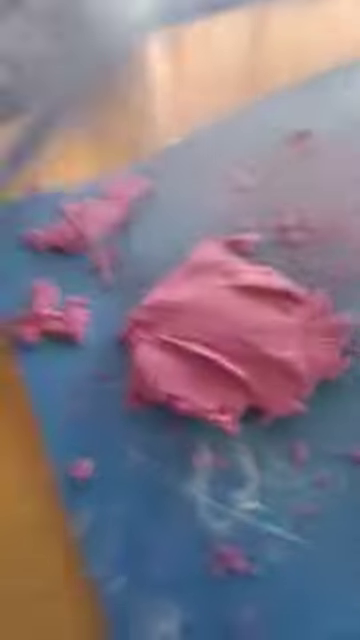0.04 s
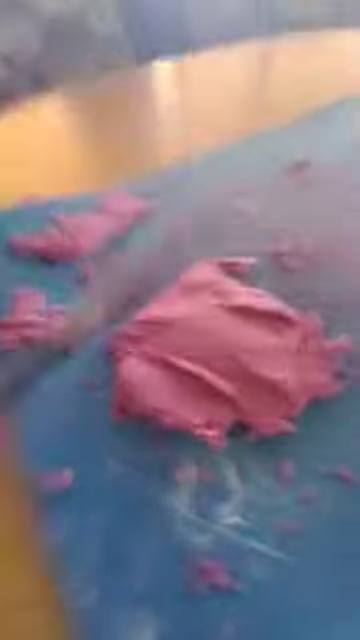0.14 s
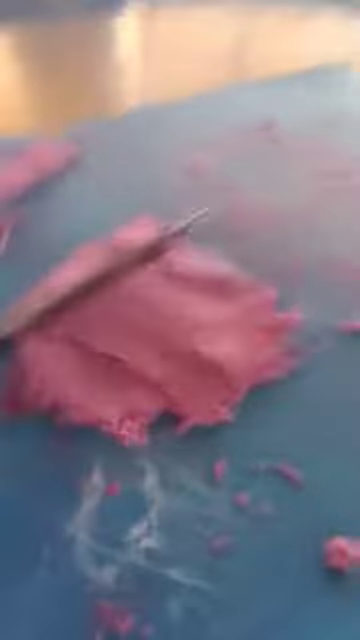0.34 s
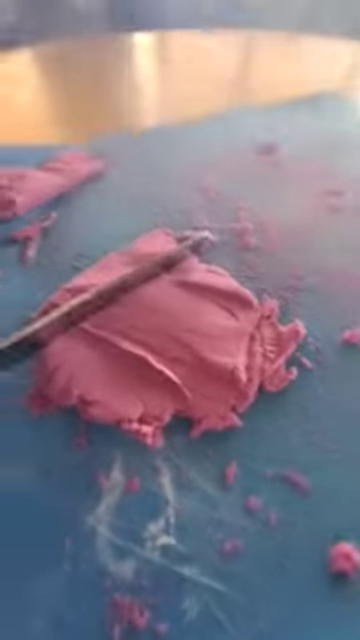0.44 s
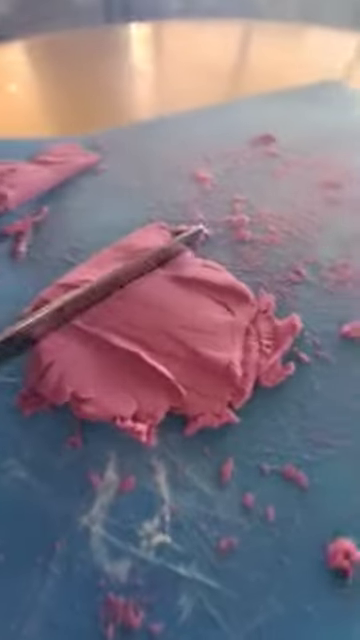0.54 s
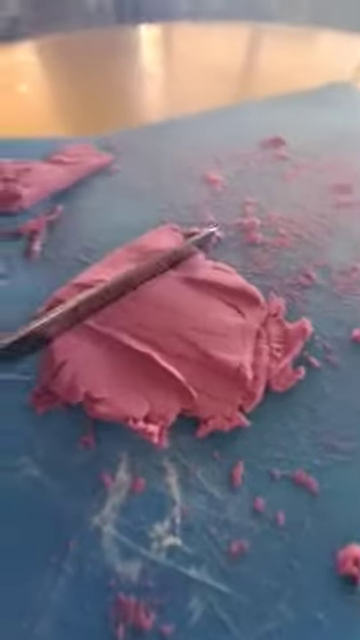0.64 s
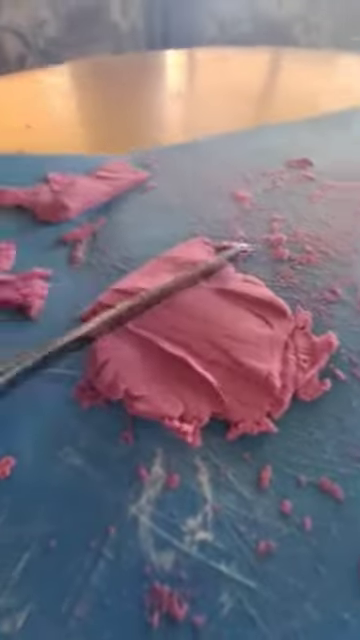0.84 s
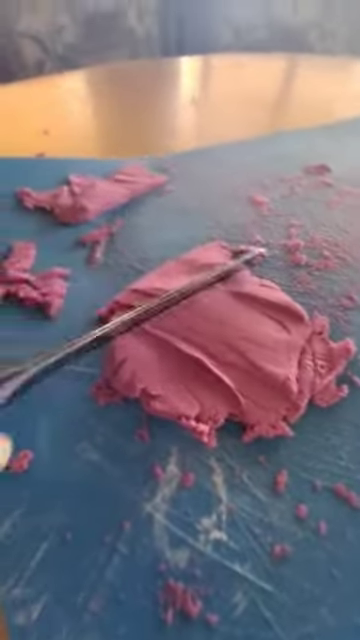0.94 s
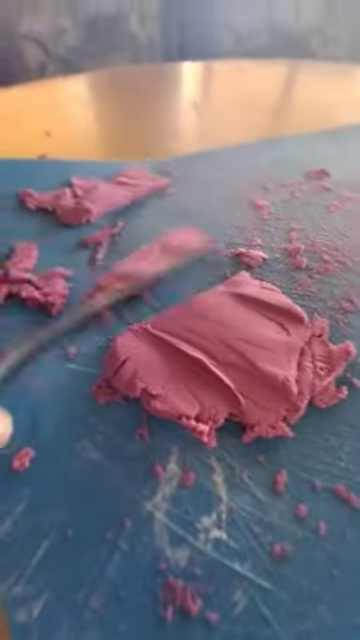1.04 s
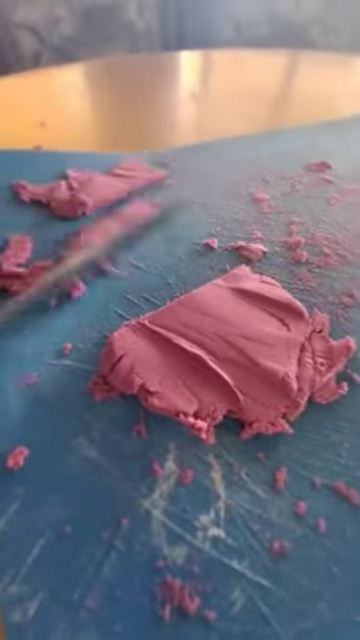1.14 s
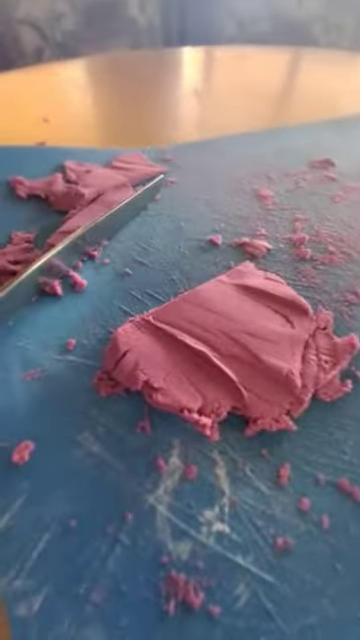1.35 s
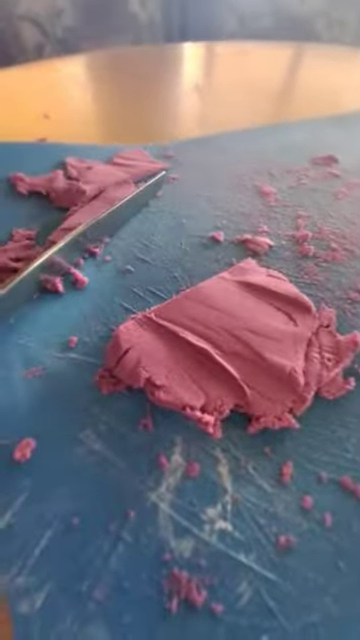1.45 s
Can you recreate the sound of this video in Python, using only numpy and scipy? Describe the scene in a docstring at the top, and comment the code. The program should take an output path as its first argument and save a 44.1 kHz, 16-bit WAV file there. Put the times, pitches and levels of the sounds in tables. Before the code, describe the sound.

Close microphone, small quiet room with faint hiss: a knife thumps the table twice, rings and rattles briefly, ticks and slips over plastic, then drags through soft sand with a grainy crunch and final light taps.

```python
"""A steel knife works through a lump of soft modelling sand on a plastic cutting board, close to the microphone.
Over hiss, faint bumps and a slip of the blade open the scene; then two loud bumps ring the table's modes.
The second sets metal modes ringing and ends in a short rattle of dense random clicks.
The blade taps and scrapes over the board in little slips, made of grit noise coloured by the board.
Then it drags a slice of sand aside in a soft crunch of grains over low rubbing; a tap and a few short slips follow."""
import sys
import numpy as np
from scipy import signal
from scipy.io import wavfile
from scipy.ndimage import uniform_filter1d

SR = 44100
rng = np.random.default_rng(int(sys.argv[2]) if len(sys.argv) > 2 else 0)


def persist_wave(psi):
    """Save psi, clipped to +-1, as 16-bit WAV."""
    counts = np.round(np.clip(psi, -1, 1) * 32767).astype(np.int16)
    wavfile.write(sys.argv[1], SR, np.atleast_2d(counts).T)


N = 66150
T = np.arange(N) / SR  # [s]

# Room and microphone noise: spectrum (frequency [Hz], relative level [dB])
HISS_COLOUR = [(60, 1.5), (160, -5), (400, -8), (700, -17), (1100, -18), (1800, -9), (3700, -13),
               (5900, -15), (7700, -11), (9300, -19.5), (16000, -21)]
# Course of the noise: (time [s], level [dB])
HISS_LEVEL = [(0, -42.5), (0.1, -48), (0.19, -45.5), (0.45, -44), (0.52, -55.5), (0.615, -61),
              (0.66, -45.5), (0.9, -50), (1.35, -47), (1.5, -49.5)]
HISS_PAN_DB = -3.5  # all pans: left over right
ROOM_T60_S, ROOM_DB = 0.34, -11

# Bumps on the table: (time [s], level [dB], tilt towards the upper modes [dB per octave])
BUMPS = [(0.002, -29, 1), (0.036, -30, -6.5), (0.2045, -14, 1), (0.236, -24.5, 3), (0.3018, -12, 2.5),
         (0.317, -17, 6.5), (0.338, -22.5, 8), (0.348, -37.5, 12.5), (0.427, -40, 1), (0.541, -38, 0.5),
         (0.581, -37, 2.5), (0.665, -34, -4)]
# Modes of table and board: (frequency [Hz], level before tilt [dB], t60 [s])
TABLE_MODES = [(64, -30, 0.077), (92.3, -8, 0.23), (102.3, -4, 0.096), (132.1, -5.5, 0.17),
               (154.2, -4, 0.22), (226.4, -9.5, 0.064), (289, -9, 0.053), (381, -10.5, 0.032),
               (586, -13, 0.042)]
# Hollow knocks of the board: (time [s], level [dB], pitch [Hz])
KNOCKS = [(0.2064, -19.5, 860), (0.3017, -6, 322), (0.3418, -16.5, 266)]

# Blows that set the metal ringing: (time [s])
CLINK_TIMES = [0.3105, 0.3485, 0.379]
# Modes of the metal: (frequency [Hz], level at first, second, third blow [dB], t60 [s])
METAL_MODES = [(1240, -40, -25, -31, .13), (1938, -46, -23, -31, .17), (3375, -52, -35, -37, .26),
               (3930, -50, -30, -35.5, .28), (5922, -34, -37, -35.5, .38), (7391, -19, -36, -38, .19),
               (8188, -40, -33, -34.5, .38), (9645, -46, -23, -42, .13), (11445, -25, -28, -52, .18),
               (13935, -31, -42, -33, .12), (14550, -39, -42, -44, .2)]
METAL_PAN_DB, METAL_RISE_S, METAL_DAMP_S = -18, 0.002, 0.003

RATTLE_S, RATTLE_HOLD_S, RATTLE_T60_S = 0.334, 0.01, 0.22
RATTLE_DB, RATTLE_PAN_DB = -16, -4
# Spectrum of the rattle: (frequency [Hz], relative level [dB])
RATTLE_COLOUR = [(60, 4.5), (200, 5), (400, -2.5), (800, -5.5), (1900, 1.5), (3600, -8), (5200, -18),
                 (8000, -15.5), (10500, -31), (16000, -24.5)]

# The lump shifts on the board: (time [s], level [dB], t60 [s])
SHOVES = [(0.0, -40, 0.68), (0.301, -16.5, 0.13), (0.66, -39.5, 0.34)]
SHOVE_RISE_S = 0.0058
# Spectrum of the low rubbing: (frequency [Hz], relative level [dB])
RUB_COLOUR = [(50, -38.5), (110, -18.5), (160, -3), (220, -5.5), (280, 1), (335, -10), (385, -2),
              (455, -21), (545, -8.5), (660, -17), (1200, -21.5), (3000, -66)]
RUB_PAN_DB = -3.5

# Sharp contacts of the blade: (time [s], level [dB], tilt [dB per octave], left over right [dB])
TAPS = [(0.2063, -16.5, -1, -0.5), (0.3022, -16, -2, -28), (0.3168, -23.5, -1, -18),
        (0.334, -15.5, 1.5, -21), (0.342, -27, -3, -37), (0.3505, -13, -3, -13), (0.5374, -28, -4.5, -10),
        (0.579, -35.5, 4, -7), (0.6655, -31.5, -4, -8), (0.7585, -24, 1.5, -29), (0.7975, -33, -2.5, -7),
        (0.980, -24.5, -1, -10), (1.0013, -24, 2.5, -10), (1.0635, -20, 1, -20), (1.103, -27, 2, -10),
        (1.1998, -15.5, 6.5, 12), (1.2705, -24, 3.5, -28)]
# Spectrum of a tap before tilt: (frequency [Hz], relative level [dB])
TAP_COLOUR = [(100, -7.5), (900, -6.5), (1450, -3.5), (3200, -6), (6000, -8.5), (10000, -19),
              (16000, -25.5)]
BOARD_HZ, BOARD_T60_S = 1443, 0.015
BOARD_RING_DB = -7  # for a tap without tilt, relative to the tap's level

# Slips of the blade over the board: (time [s], length [s], level before the swell [dB], tilt [dB per octave])
SLIPS = [(0.004, 0.02, -43, -0.5), (0.304, 0.023, -32.5, -4), (0.626, 0.03, -53.5, 3.5),
         (0.662, 0.059, -41, 1), (0.75, 0.009, -37, -0.5), (0.777, 0.025, -34, -1.5),
         (0.823, 0.009, -45, 0.5), (0.873, 0.015, -47.5, 0), (0.909, 0.028, -45.5, -0.5),
         (0.963, 0.023, -41.5, 0.5), (0.995, 0.0357, -42, -0.5), (1.216, 0.026, -42, 1.5),
         (1.271, 0.006, -36.5, -0.5), (1.294, 0.018, -44.5, 1), (1.438, 0.033, -47, 0.5)]
SLIP_RISE_S, SLIP_SWELL_DB, SLIP_RELEASE_S = 0.0047, 6.5, 0.0048
# Spectrum of the scraped board before tilt: (frequency [Hz], relative level [dB])
BOARD_COLOUR = [(60, -29), (220, -2), (400, -13.5), (1100, -11.5), (1400, 0), (1800, 5.5), (2250, -17.5),
                (2800, -2), (3800, -10.5), (4400, -2), (5600, -14), (8100, -9), (10000, -24.5),
                (13500, -16), (16000, -27)]

# The long cut: (time [s], level of the crunch [dB], level of the low rubbing [dB])
CUT = [(0.958, -44.5, -45.5), (1.004, -50, -49.5), (1.024, -37, -29.5), (1.06, -34.5, -31.5),
       (1.085, -37.5, -34), (1.12, -31.5, -32.5), (1.171, -29, -29), (1.19, -32, -37), (1.212, -29.5, -36),
       (1.245, -35, -37), (1.254, -50, -41), (1.34, -61, -70)]
# Spectrum of the crunching sand: (frequency [Hz], relative level [dB])
CRUNCH_COLOUR = [(410, -53), (700, -22), (1140, -15.5), (1820, -4), (2100, -4.5), (6740, -7.5), (7790, 0.5),
                 (8880, -12.5), (14200, -10.5), (16000, -17)]
SING_HZ, SING_WIDTH_HZ = 7740, 83  # resonance of the blade in the sand
SING_DB = -12.5  # relative to the crunch

LOW_CUT_HZ, EDGE_HZ = 43, 15800


def amp(db):
    """Turns decibels into gain."""
    return 10 ** (np.asarray(db) / 20)


def unit(x):
    """Scales a sound to rms 1."""
    return x / np.sqrt(np.mean(x ** 2) + 1e-20)


def pan(db):
    """Left and right gains with mean power 1."""
    g = amp(np.atleast_1d(db) / 2)
    return np.array([g, 1 / g]) / np.sqrt((g ** 2 + g ** -2) / 2)


def add(mix, s, sound):
    """Mixes a sound in at time s."""
    part = mix[:, max(round(s * SR), 0):][:, :sound.shape[1]]
    part += sound[:, :part.shape[1]]


def colour(x, points, tilt_db=0, size=4096):
    """Causal filter of unit energy, built from a spectrum and a tilt per octave above 500 Hz."""
    hz = abs(np.fft.fftfreq(size, 1 / SR)) + 1
    f, db = np.transpose(points)
    db = np.interp(np.log(hz), np.log(f), db)
    db = db + tilt_db * np.log2(np.maximum(hz, 500))
    # The Hilbert transform of the log gain gives the minimum phase
    log_gain = np.log(amp(db - db.max()) + 1e-5)
    impulse = np.fft.ifft(np.exp(signal.hilbert(log_gain).conj())).real[:size // 2]
    impulse = impulse / np.linalg.norm(impulse)
    return signal.fftconvolve(x, impulse[None], axes=1)[:, :x.shape[1]]


def ports(x, alike):
    """Makes two unrelated channels partly alike."""
    c = np.clip(alike, -.99, .99)
    return np.array([x[0], c * x[0] + np.sqrt(1 - c * c) * x[1]])


def grains(per_s, spread_db, alike):
    """Random clicks of uneven size, heard at both microphone ports."""
    size = amp(spread_db * np.minimum(rng.exponential(1, N), 4))
    struck = rng.random(N) < per_s / SR
    return unit(ports(size * struck * rng.standard_normal((2, N)), alike))


def clumps(depth_db, length_s=0.0066):
    """Random swelling, as grains give way in clumps."""
    drift = uniform_filter1d(rng.standard_normal(N), max(int(length_s * SR), 1))
    return amp(depth_db * unit(drift))


def hiss():
    """Room and microphone noise whose level wavers, dipping deepest after the loud bumps."""
    noise = colour(ports(rng.standard_normal((2, N)), alike=0.2), HISS_COLOUR)
    return pan(HISS_PAN_DB) * noise * amp(np.interp(T, *np.transpose(HISS_LEVEL)))


def room(x):
    """A small room's short, faint tail: decaying noise that answers each sound after 4 ms."""
    t = T[:N // 3]
    tail = rng.standard_normal((2, len(t))) * amp(-60 * t / ROOM_T60_S) * (t > .004)
    tail = tail / np.linalg.norm(tail[0])
    return amp(ROOM_DB) * signal.fftconvolve(x, tail, axes=1)[:, :N]


def bumps(rise_s=0.001, quicken_db=2.0, pan_db=-5, lag_s=0.00056):
    """Each bump rings the table's low modes; a brighter tilt rises faster, and the left port hears it later."""
    out = np.zeros((2, N))
    t = np.maximum(T[:N // 3] - np.array([[lag_s], [0]]), 0)
    pivot_hz = TABLE_MODES[3][0]
    for s, db, tilt_db in BUMPS:
        ring = 0
        for hz, mode_db, t60 in TABLE_MODES:
            level_db = mode_db + tilt_db * np.log2(hz / pivot_hz)
            ring = ring + amp(level_db - 60 * t / t60) * np.cos(2 * np.pi * hz * t)
        rise = 1 - np.exp(-t / rise_s * amp(quicken_db * tilt_db))
        add(out, s, -amp(db) * pan(pan_db) * ring * rise)
    return out


def knocks(t60=0.014, pan_db=-4, lag_s=0.00058):
    """The board slaps the table: a hollow knock of a few cycles, later at the left port."""
    out = np.zeros((2, N))
    t = np.maximum(T[:N // 30] - np.array([[lag_s], [0]]), 0)
    for s, db, hz in KNOCKS:
        add(out, s, -pan(pan_db) * amp(db - 60 * t / t60) * np.sin(2 * np.pi * hz * t))
    return out


def clinks():
    """Each blow stops the previous ring and starts the metal modes afresh, in its own proportions."""
    out, t = np.zeros((2, N)), T[:N // 2]
    held_s = np.diff(CLINK_TIMES, append=T[-1])
    for k, (s, held) in enumerate(zip(CLINK_TIMES, held_s)):
        ring = 0
        for hz, *blow_db, t60 in METAL_MODES:
            ring = ring + amp(blow_db[k] - 60 * t / t60) * np.sin(2 * np.pi * hz * t)
        rise = 1 - np.exp(-t / METAL_RISE_S)
        damping = np.exp(-np.maximum(t - held, 0) / METAL_DAMP_S)
        add(out, s, pan(METAL_PAN_DB) * ring * rise * damping)
    return out


def rattle():
    """Dense small impacts that hold briefly and die away."""
    fading_s = np.maximum(T - RATTLE_S - RATTLE_HOLD_S, 0)
    level = (T > RATTLE_S) * amp(RATTLE_DB - 60 * fading_s / RATTLE_T60_S)
    impacts = level * grains(per_s=6500, spread_db=3.5, alike=0.19)
    return pan(RATTLE_PAN_DB) * colour(impacts, RATTLE_COLOUR)


def rubbing():
    """The lump rubs over the board, a low grainy noise during the long cut and at each shove."""
    s, _, rub_db = np.transpose(CUT)
    level = np.interp(T, s, amp(rub_db), 0, 0)
    for at, db, t60 in SHOVES:
        rise = np.clip((T - at) / SHOVE_RISE_S, 0, 1)
        level = level + rise * amp(db - 60 * abs(T - at) / t60)
    grit = grains(per_s=2500, spread_db=1.5, alike=0.81)
    return pan(RUB_PAN_DB) * colour(level * grit, RUB_COLOUR)


def taps(t60=0.014, dull_db=2.0):
    """Steel meets plastic: a crack dies within milliseconds; the duller the tap, the more the board rings."""
    out, t = np.zeros((2, N)), T[:N // 12]
    for s, db, tilt_db, pan_db in TAPS:
        crack = ports(rng.standard_normal((2, len(t))), alike=0.28) * amp(-60 * t / t60)
        ring_db = BOARD_RING_DB - dull_db * tilt_db
        ring = amp(ring_db - 60 * t / BOARD_T60_S) * np.sin(2 * np.pi * BOARD_HZ * t)
        add(out, s, amp(db) * pan(pan_db) * (colour(crack, TAP_COLOUR, tilt_db) + ring))
    return out


def slips(pan_db=-9):
    """Grit under the blade excites the board; each slip swells and stops."""
    out = np.zeros((2, N))
    grit = grains(per_s=7000, spread_db=3.5, alike=0.05) * clumps(depth_db=1.5)
    for s, length, db, tilt_db in SLIPS:
        part = grit[:, max(round(s * SR), 0):][:, :N // 10]
        t = T[:part.shape[1]]
        rise = np.minimum(t / SLIP_RISE_S, 1)
        swell = amp(db + SLIP_SWELL_DB * np.minimum(t / length, 1))
        release = np.exp(-np.maximum(t - length, 0) / SLIP_RELEASE_S)
        add(out, s, pan(pan_db) * colour(rise * swell * release * part, BOARD_COLOUR, tilt_db))
    return out


def cut(pan_db=-2):
    """Sand grains shear along the blade, which sings faintly as a narrow resonance."""
    s, crunch_db, _ = np.transpose(CUT)
    level = np.interp(T, s, amp(crunch_db), 0, 0)
    sand = grains(per_s=9000, spread_db=3.0, alike=0.042) * clumps(depth_db=1.97)
    sand = sand * level * pan(pan_db)
    t = T[:N // 30]
    blade = np.exp(-np.pi * SING_WIDTH_HZ * t) * np.sin(2 * np.pi * SING_HZ * t)
    blade = blade / np.linalg.norm(blade)
    sing = signal.fftconvolve(sand, blade[None], axes=1)[:, :N]
    return colour(sand, CRUNCH_COLOUR) + amp(SING_DB) * sing


def scene():
    """Sounds on the table get the room's tail; the thin metal ring and the hiss stay dry."""
    near = bumps() + knocks() + rattle() + rubbing() + taps() + slips() + cut()
    return hiss() + room(near) + clinks() + near


def record(dry):
    """Bass roll-off of the microphone, full-scale limit, then the band limit."""
    roll_off = signal.butter(3, LOW_CUT_HZ, "high", fs=SR, output="sos")
    limited = np.clip(signal.sosfilt(roll_off, dry), -1, 1)
    band = signal.firwin(401, EDGE_HZ, window=("kaiser", 8), fs=SR)
    return signal.oaconvolve(limited, band[None], "same")


dry = scene()
out = record(dry)
persist_wave(out)
```